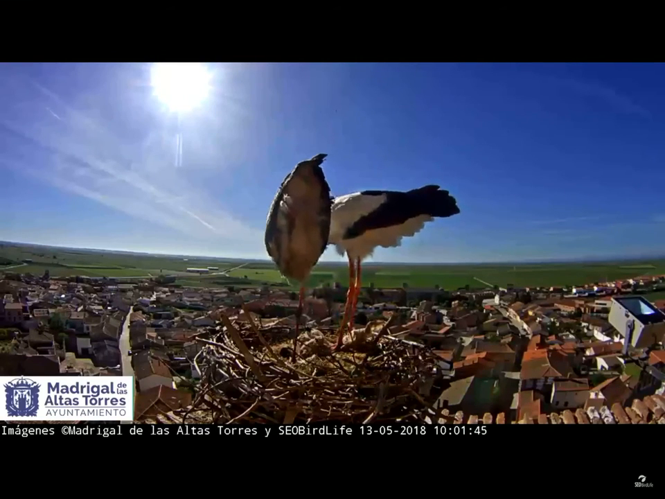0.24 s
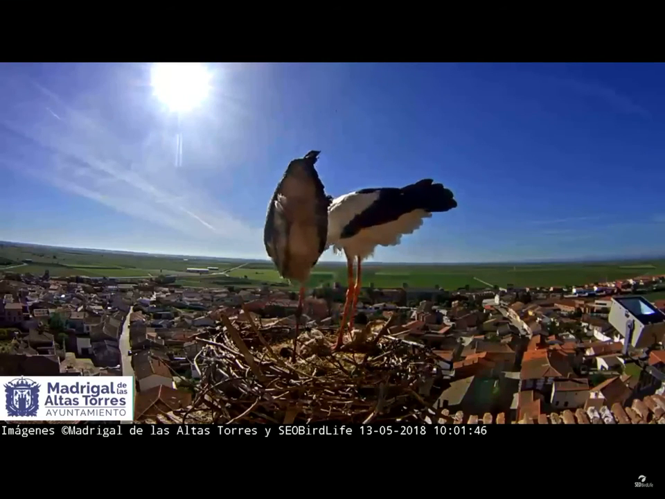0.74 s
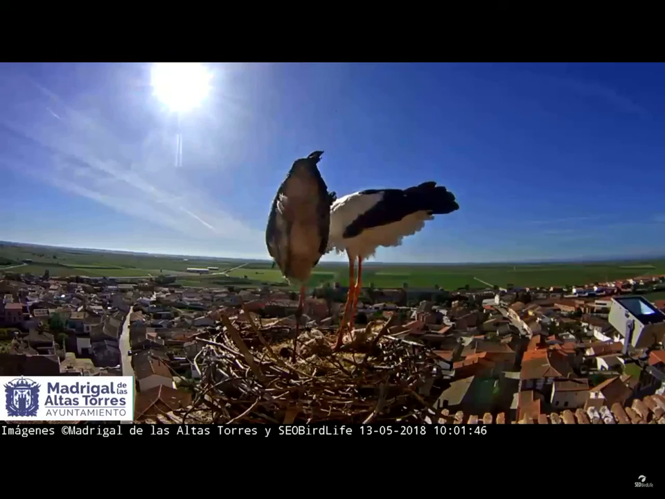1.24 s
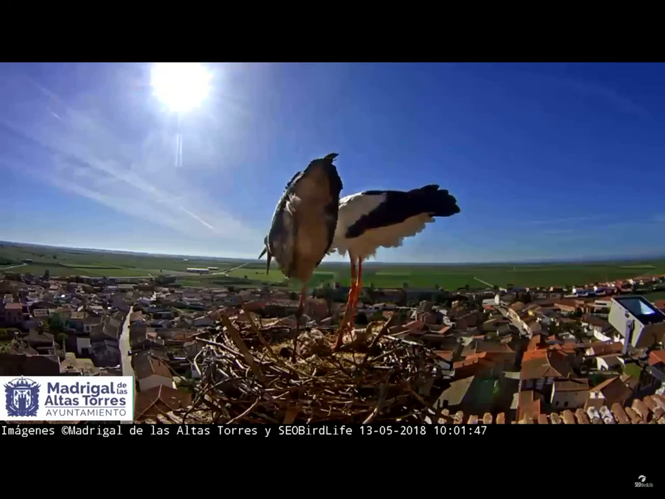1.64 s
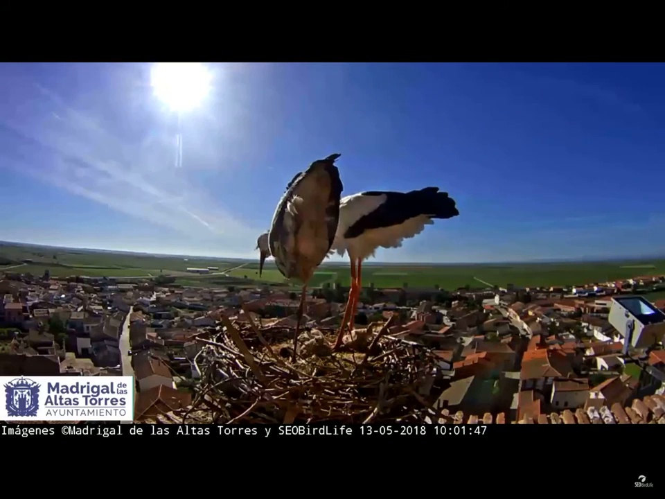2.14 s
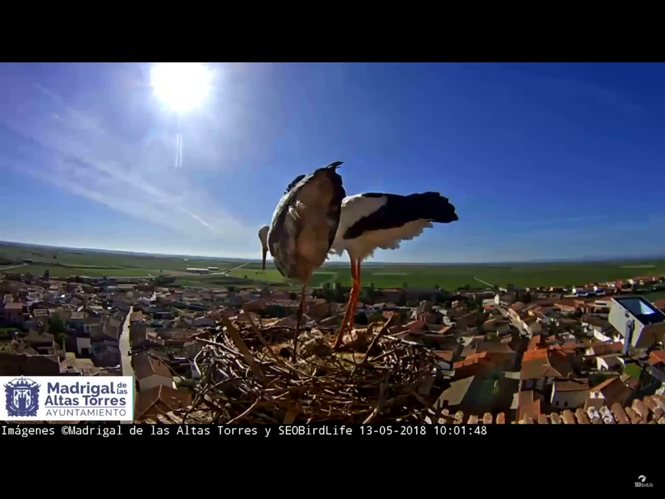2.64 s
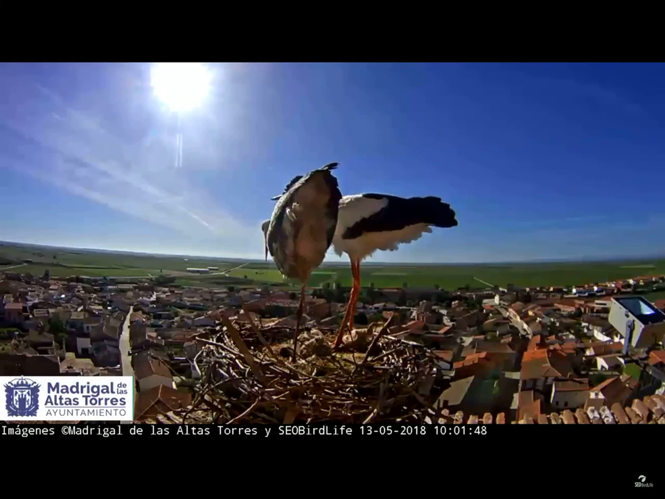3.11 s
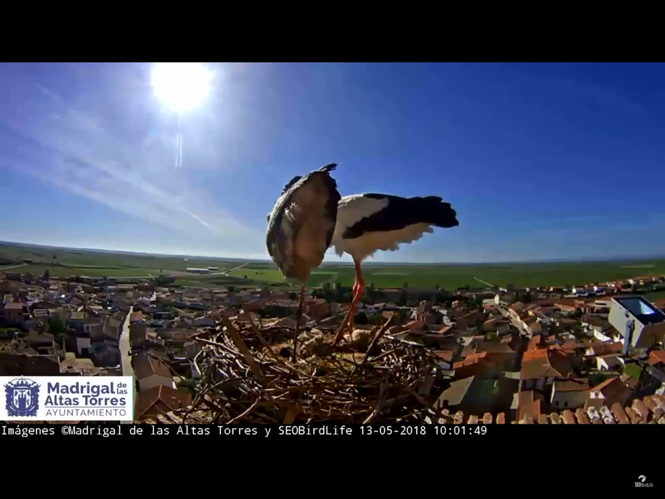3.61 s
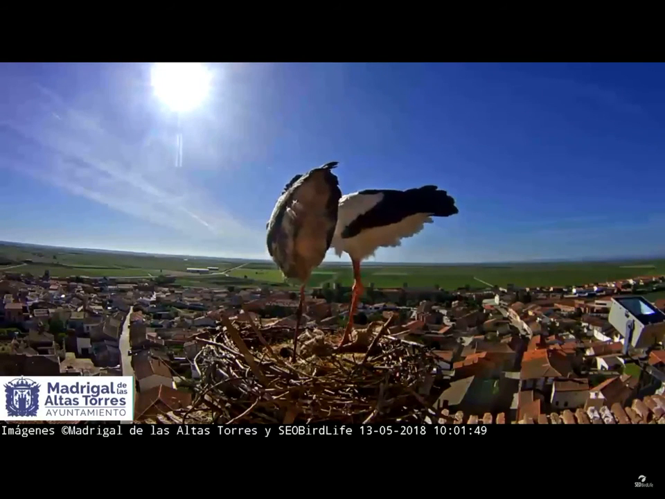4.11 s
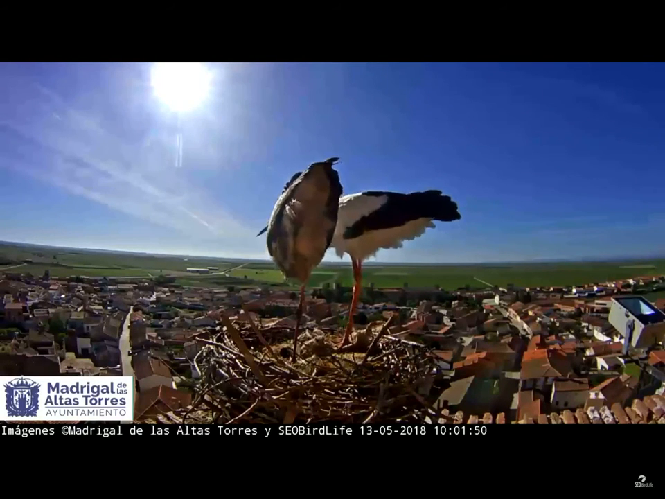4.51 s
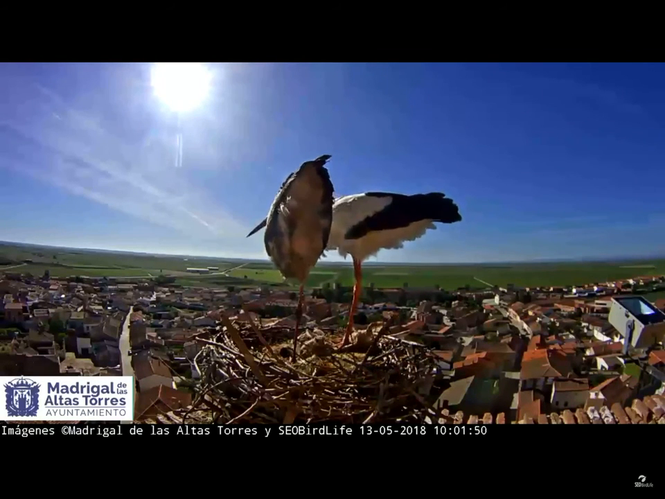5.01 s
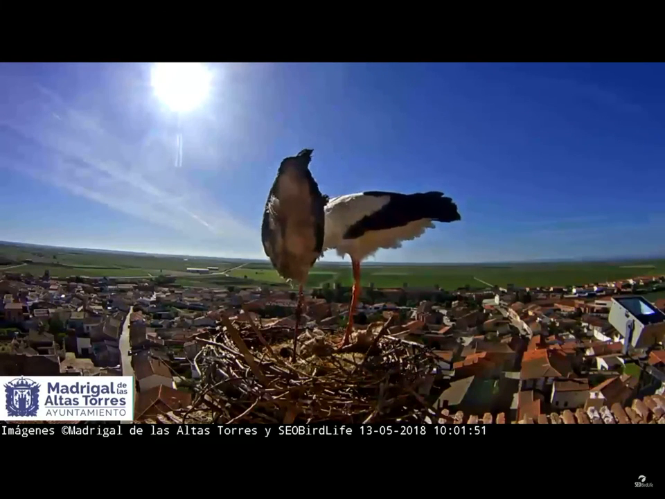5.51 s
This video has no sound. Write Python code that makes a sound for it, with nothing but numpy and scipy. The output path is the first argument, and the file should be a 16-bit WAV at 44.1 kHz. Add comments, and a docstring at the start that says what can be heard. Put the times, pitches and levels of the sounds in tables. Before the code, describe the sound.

Two white storks clatter their bills in rapid hollow knocks over a gusty breeze and low hum, with one brief dropout midway.

```python
"""From the start, a gusty breeze buffets the microphone of a nest camera that hums with the mains.
At once two white storks clatter their bills, seven to eight knocks a second, in and out of step.
Each knock is a double touch that rings bill and throat pouch; the nest scatters it, a roof echoes it.
The deeper bird rests from 1.8 to 2.7 s. Near 3 s all sound cuts out for half a second,
then it returns with a faint tick, and both birds clatter on to the end."""
import sys
import numpy as np
from scipy import signal
from scipy.fft import rfft, irfft, next_fast_len
from scipy.io import wavfile
from scipy.ndimage import uniform_filter1d, map_coordinates

SR = 44100
rng = np.random.default_rng(int(sys.argv[2]) if len(sys.argv) > 2 else 0)


def int16_out(signal):
    """Quantize to a 16-bit WAV file."""
    q = np.round(np.clip(np.atleast_2d(signal).T, -1, 1) * 32767)
    wavfile.write(sys.argv[1], SR, q.astype(np.int16))


N = 253575

# the tones of the mains hum: f/Hz, level/dB
HUM_TONES = [(50, -44), (150, -68.5)]
# tone colour of the air's hiss and the wind's rumble, flutter and rasp: f/Hz, relative level/dB
HISS_COLOUR = [(100, -13.5), (300, 2), (700, -3), (1200, -6.5), (2500, -7.5), (4500, -11.5), (7000, -15),
               (9000, -31.5)]
RUMBLE_COLOUR = [(8, 0), (18, 6.5), (30, 3), (50, -6.5), (80, -7.5), (120, -25.5), (200, -44), (400, -68.5)]
FLUTTER_COLOUR = [(50, -35.5), (90, 1), (130, 0.5), (250, -11), (400, -22), (700, -45), (1300, -38.5),
                  (7000, -74)]
RASP_COLOUR = [(100, -27), (250, -3), (370, 5), (550, -6.5), (750, -9), (1200, -27.5), (2500, -31.5),
               (7000, -43)]
# strength of the breeze between gusts: t/s, relative rumble level/dB, relative flutter level/dB
BREEZE = [(0, -44, -61), (0.2, -45, -65), (0.67, -47, -63), (0.92, -46, -53), (1.18, -51, -66.5),
          (1.5, -45, -58.5), (1.76, -48, -64), (2.12, -42.5, -57.5), (2.58, -49, -63.5), (2.78, -42.5, -60),
          (3.62, -42.5, -67.5), (3.72, -42, -54), (3.87, -46, -58), (4.05, -58.5, -72), (4.2, -62, -68),
          (4.55, -49.5, -66.5), (4.88, -49, -65), (5.22, -46, -56), (5.55, -47.5, -59),
          (5.75, -47.5, -64.5)]
# single gusts: peak t/s, length/s, relative rumble level/dB, relative flutter level/dB
GUSTS = [(0.075, 0.084, -37.5, -51), (0.287, 0.056, -37.5, -47.5), (0.372, 0.06, -35, -46),
         (0.539, .06, -35.5, -44.5), (0.761, 0.051, -42, -47), (0.852, 0.047, -50.5, -51),
         (1.029, .1, -40, -50.5), (1.463, 0.099, -40, -52.5), (1.571, 0.068, -35, -46),
         (1.897, 0.092, -38, -55), (2.04, 0.1, -32, -42), (2.203, 0.044, -39, -47.5),
         (2.274, .1, -33, -51.5), (2.926, 0.058, -35, -57), (3.47, 0.053, -42.5, -52.5),
         (3.534, 0.058, -37, -45.5), (4.476, 0.11, -38.5, -52.5), (4.73, 0.18, -40.5, -50.5),
         (5.017, .1, -36.5, -47), (5.342, 0.13, -38.5, -52)]
# narrow notches in the tone colour, the deepest near 3 kHz: f/Hz, width/Hz, level/dB
TONE_NOTCHES = [(2953, 62, -14), (4160, 91, -2), (5430, 200, -8.5)]

# each bird's beat, one list for each run of knocks: t/s, knocks since the run began
DEEP_RUNS = [
    [(0.0216, 0), (0.2803, 2), (0.5346, 4), (0.7921, 6), (1.0447, 8), (1.5567, 12), (1.8053, 14)],
    [(2.7119, 0), (2.847, 1), (3.6196, 7), (3.9887, 10), (4.6405, 15), (5.0092, 18), (5.3936, 21),
     (5.6561, 23)],
]
SHARP_RUNS = [
    [(0.0535, 0), (0.9204, 6), (1.5004, 10), (2.5066, 17), (2.649, 18), (2.9421, 20)],
    [(3.6618, 0), (3.9524, 2), (4.3837, 5), (4.9777, 9), (5.1227, 10), (5.5614, 13), (5.7102, 14)],
]
# how the knocks change as the head moves: t/s, relative level/dB, pouch f/Hz, brightness/dB
DEEP_EFFORT = [(0.02, -43.5, 1647, 0.5), (0.601, -42, 1618, 1.5), (1.101, -41.8, 1614, -4.5),
               (1.43, -44, 1587, 3), (1.681, -47, 1584, 5.5), (1.8, -52.5, 1505, 1),
               (2.711, -52.5, 1650, 0.5), (2.85, -48, 1590, 6.5), (3.49, -46.5, 1520, 4),
               (3.75, -46.5, 1594, 5.5), (4.1, -45, 1593, 5.5), (4.5, -47.5, 1500, 5),
               (5.001, -49, 1490, 5), (5.351, -46, 1617, 4), (5.66, -43.5, 1590, 4.5)]
SHARP_EFFORT = [(0.05, -40, 1970, 0), (0.34, -41, 1965, -8), (0.632, -37.5, 1974, -2),
                (0.949, -40.5, 1900, -0.5), (1.45, -42, 1930, 2), (2.05, -42.5, 1877, -1.5),
                (2.362, -43.5, 1907, 0), (2.581, -43, 1950, -2.5), (2.94, -43, 1940, 1.5),
                (3.799, -43, 1896, 2.5), (4.15, -43.5, 1890, 1), (4.68, -40, 1910, 1),
                (5.001, -39, 1915, -7.5), (5.419, -42.5, 1900, -1.5), (5.71, -41.5, 1910, -5)]
# the tones that ring in each bill and throat: f/Hz, relative level/dB, 60 dB fade time/s
DEEP_TONES = [(707.3, -5, 0.039), (1496, -3, 0.014), (1681, 8.5, 0.023), (2203, 5, 0.013), (2405, 8, 0.016),
              (3235, 2.5, 0.016), (3580, -1, 0.027), (3906, -12, 0.017), (4340, -8, 0.037),
              (4980, -7, 0.0078), (5706, 1, 0.013), (6400, -14.5, 0.012)]
SHARP_TONES = [(754, -7, 0.047), (1670, -15, 0.034), (1877, 5.5, 0.028), (2650, -10, 0.01),
               (2657, 14, 0.02), (3451, -1.5, 0.022), (3521, 10, 0.022), (3940, -2, 0.018),
               (4770, 2.5, 0.015), (5425, -4, 0.026), (5900, -4.5, 0.026), (6652, -1.5, 0.015)]
# tone colour of the sound scattered by twigs and tiles: f/Hz, relative level/dB
SCATTER_COLOUR = [(150, -25.5), (400, 6), (800, -1), (1500, -3), (2700, -4.5), (5000, -3), (7500, -10)]
# how long that scattered sound lasts: f/Hz, 60 dB fade time/s
SCATTER_FADE = [(300, 0.077), (800, 0.098), (2500, 0.092), (7000, .1)]
# what the tiled roof sends back: f/Hz, relative level/dB
ROOF_COLOUR = [(700, -12.5), (1800, -13), (2700, 2), (7000, -9.5)]

SWAY_DB, SWAYS_PER_S = 2.5, 14  # unsteadiness of the breeze
FLUTTER_STEEPNESS = 1.8  # above 1, a gust's flutter comes and goes faster than its rumble
SCATTER_RISE_S, ROOF_DELAY_S = .007, .0267
SECOND_BOUNCE_DELAY_S, SECOND_BOUNCE_DB = 0.043, -20.5  # a second bounce off the roof, compared with the first
GAP_START_S, GAP_END_S = 2.9475, 3.46
TREBLE_LIMIT_HZ = 7480


def amp(db):
    """Turn decibels into a number to multiply by."""
    return 10 ** (np.asarray(db) / 20)


def along(points, hz):
    """Read a table of (f/Hz, value) at hz, giving every octave the same room."""
    f, values = np.transpose(points)
    return np.interp(np.log(hz + 1), np.log(f + 1), values)


def curves(rows, times):
    """Read each column after the first at the given times."""
    row_times, *columns = np.transpose(rows)
    return [np.interp(times, row_times, column) for column in columns]


def wobble(rate):
    """A smooth curve through `rate` random values a second."""
    values = rng.standard_normal(int(N * rate / SR) + 4)
    return map_coordinates(values, [np.arange(N) * rate / SR])


def filtered(x, response):
    """Turn each frequency in x up or down by response(hz)."""
    size = next_fast_len(len(x) + SR // 10)
    hz = np.fft.rfftfreq(size, 1 / SR)
    return irfft(rfft(x, size) * response(hz), size)[:len(x)]


def noise(colour, size=N):
    """Noise with the given tone colour and an average power of 1."""
    x = filtered(rng.standard_normal(size), lambda hz: amp(along(colour, hz)))
    return x / np.sqrt(np.mean(x ** 2) + 1e-20)


def steadied(x, seconds):
    """Even out the slow swells in x."""
    power = uniform_filter1d(x ** 2, int(seconds * SR))
    return x / np.sqrt(np.abs(power) + 1e-6)


def add(track, start_s, sound):
    """Mix a sound into the track from start_s on."""
    part = track[max(round(start_s * SR), 0):][:len(sound)]
    part += sound[:len(part)]


def airflow():
    """Rumble and flutter levels in dB: a swaying breeze plus a smooth swell for each gust."""
    t = np.arange(N) / SR
    breeze_db = np.array(curves(BREEZE, t)) + SWAY_DB * wobble(SWAYS_PER_S)
    rumble_power, flutter_power = amp(breeze_db) ** 2
    for peak_s, length_s, rumble_db, flutter_db in GUSTS:
        swell = np.exp(-(2 * (t - peak_s) / length_s) ** 2)
        rumble_power += amp(rumble_db) ** 2 * swell
        flutter_power += amp(flutter_db) ** 2 * swell ** FLUTTER_STEEPNESS
    return 10 * np.log10([rumble_power, flutter_power])


def wind():
    """Gusts push on the microphone; strong ones break into swirls that flutter and rasp."""
    rumble_db, flutter_db = airflow()
    rumble = amp(rumble_db + 2.68) * steadied(noise(RUMBLE_COLOUR), seconds=.06)
    swirls = amp(1.5 * wobble(rate=60)) * steadied(noise(FLUTTER_COLOUR), seconds=.04)
    flutter = amp(flutter_db + 1.48) * swirls
    # small swirls grow faster than large ones, so strong gusts are brighter
    rasp_db = 1.7 * (flutter_db + 41) + 2.5 * wobble(rate=90) - 53.5
    rasp = amp(rasp_db) * noise(RASP_COLOUR)
    return rumble + flutter + rasp


def mains_hum():
    """Mains power makes the camera hum with steady low tones."""
    t = np.arange(N) / SR
    return sum(amp(db) * np.sqrt(2) * np.sin(2 * np.pi * (hz * t + rng.random()))
               for hz, db in HUM_TONES)


def air_hiss():
    """The open air hisses faintly, a little louder and softer by turns."""
    return amp(-73 + wobble(rate=2.1)) * noise(HISS_COLOUR)


def notches(hz):
    """Turn down a few narrow bands of the sound, most of all near 3 kHz."""
    response = 1
    for centre, width, db in TONE_NOTCHES:
        band = 1j * hz * width / (centre ** 2 - hz ** 2 + 1j * hz * width)
        response = response * (1 - (1 - amp(db)) * band)
    return response


def beat(run):
    """The knock times of one run, evenly spaced between its rows."""
    times, counts = np.transpose(run)
    return np.interp(np.arange(counts[-1] + 1), counts, times)


def plan_knocks(runs, effort, throat_db, throat_evenness):
    """One bird's knocks as rows: t/s, relative level/dB, pouch f/Hz, hollowness/dB, brightness/dB."""
    times = np.concatenate([beat(run) for run in runs])
    db, pouch_hz, bright_db = curves(effort, times)
    # the throat booms about equally for any force, so soft knocks sound hollower
    hollow_db = throat_db - throat_evenness * (db - db.mean())
    return np.transpose([times, db, pouch_hz, hollow_db, bright_db])


def bill_ring(tones, rest_hz, pouch_hz, hollow_db, bright_db, attack_s, vary_db):
    """The two halves of the bill meet, and bill and throat ring with quickly fading tones."""
    t = np.arange(SR // 20) / SR
    hz, db, fade_s = np.transpose(tones)
    # stretching the throat pouch retunes the tones near its own pitch
    nearness = np.exp(-(np.log(hz / rest_hz) / 0.38) ** 2)
    detune = 1 + .006 * rng.standard_normal(len(hz))
    tuned_hz = hz * (pouch_hz / rest_hz) ** nearness * detune
    # hollowness lifts the lowest tone, brightness the highest ones
    colour_db = along([(800, hollow_db), (1300, 0), (3300, 0), (4600, bright_db)], hz)
    gains = amp(db + colour_db + vary_db * rng.standard_normal(len(hz)))
    waves = np.sin(2 * np.pi * tuned_hz[:, None] * t) * amp(-60 * t / fade_s[:, None])
    return gains @ waves * (1 - np.exp(-t / attack_s))


def bill_tick(t):
    """The hard edges of the bill meet with a tiny crack, over in about one vibration."""
    hz = 4200 * np.exp(.15 * rng.standard_normal())
    return np.sin(2 * np.pi * hz * t) * np.exp(-t / .00012)


def nest_scatter():
    """Twigs and tiles bounce sound back as a short tail, new each time, with a total energy of 1."""
    hz, t, bands = signal.stft(noise(SCATTER_COLOUR, size=SR // 6), SR, nperseg=128)
    fade = amp(-60 * t / along(SCATTER_FADE, hz)[:, None])
    _, tail = signal.istft(bands * fade, SR, nperseg=128)
    tail *= 1 - np.exp(-np.arange(len(tail)) / SR / SCATTER_RISE_S)
    return tail / np.linalg.norm(tail)


def echoes(cracks):
    """The roof colours the cracks it sends back; a second bounce off the roof answers later and more faintly."""
    roof = filtered(cracks, lambda hz: amp(along(ROOF_COLOUR, hz)))
    second_bounce = np.zeros(N)
    add(second_bounce, SECOND_BOUNCE_DELAY_S, amp(SECOND_BOUNCE_DB) * roof)
    return roof + second_bounce


def stork(knocks, tones, rest_hz, bounce_s, bounce_gain, attack_s, vary_db,
          tick_db, bounce_tick_db, scatter_db, echo_db):
    """One bird clatters: each knock rings, bounces once, scatters in the nest and echoes."""
    direct, scattered, cracks = np.zeros((3, N))
    for start_s, db, pouch_hz, hollow_db, bright_db in knocks:
        ring = amp(db) * bill_ring(tones, rest_hz, pouch_hz, hollow_db, bright_db, attack_s, vary_db)
        t = np.arange(len(ring)) / SR
        knock = ring + amp(db + bright_db + tick_db) * bill_tick(t)
        # the halves of the bill spring apart and touch once more
        bounce = bounce_gain * ring + amp(db + bright_db + bounce_tick_db) * bill_tick(t)
        add(knock, bounce_s, bounce)
        add(direct, start_s, knock)
        # the crack rattles back from the twigs, and a little of the ring with it
        add(scattered, start_s, amp(db + scatter_db) * nest_scatter())
        add(scattered, start_s, amp(-16) * signal.fftconvolve(knock, nest_scatter()))
        # mostly the first crack carries to the roof and back
        add(cracks, start_s + ROOF_DELAY_S, knock * (.15 + np.exp(-t / .0018)))
    return direct + scattered + amp(echo_db) * echoes(cracks)


def scene():
    """Wind, hum, hiss and both birds, mixed into one channel."""
    background = wind() + mains_hum() + air_hiss()
    deep_knocks = plan_knocks(DEEP_RUNS, DEEP_EFFORT, throat_db=5.5, throat_evenness=1.0)
    deep = stork(deep_knocks, DEEP_TONES, rest_hz=1628, bounce_s=.0013, bounce_gain=0.51,
                 attack_s=0.00026, vary_db=1.65, tick_db=8, bounce_tick_db=4,
                 scatter_db=15, echo_db=-18)
    sharp_knocks = plan_knocks(SHARP_RUNS, SHARP_EFFORT, throat_db=0.14, throat_evenness=1.1)
    sharp = stork(sharp_knocks, SHARP_TONES, rest_hz=1858, bounce_s=.00127, bounce_gain=0.26,
                  attack_s=0.0003, vary_db=1.05, tick_db=3, bounce_tick_db=0,
                  scatter_db=12, echo_db=-15.5)
    return (background + deep + sharp)[None]


def record(dry):
    """The sound has narrow notches and no top treble; it cuts out once and returns with a tick."""
    t = np.arange(N) / SR
    sound_on = (t < GAP_START_S) | (t > GAP_END_S)
    heard = filtered(dry[0], notches) * sound_on
    return_tick = amp(-56) * np.exp(-t / .012) * rng.standard_normal(N)
    add(heard, GAP_END_S, return_tick)
    return filtered(heard, lambda hz: 1 / np.sqrt(1 + (hz / TREBLE_LIMIT_HZ) ** 100))[None]


dry = scene()
out = record(dry)
int16_out(out)
```